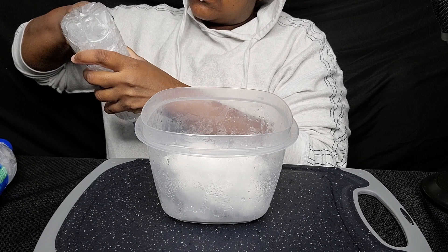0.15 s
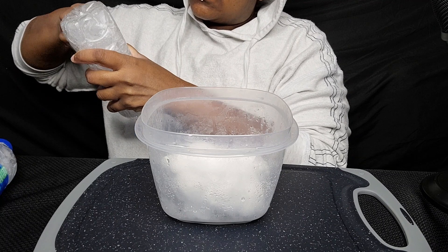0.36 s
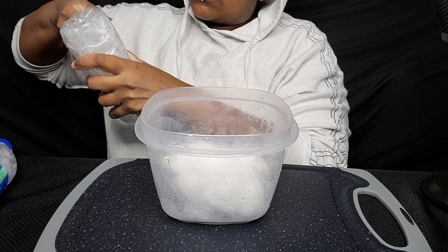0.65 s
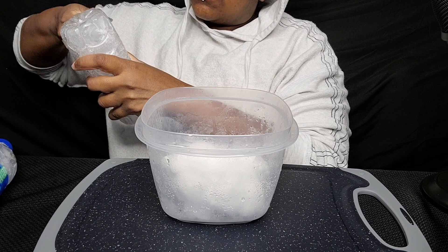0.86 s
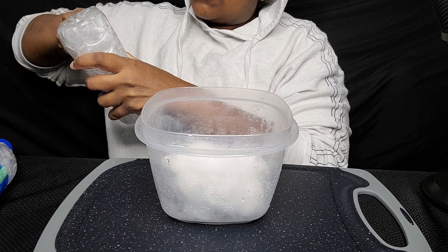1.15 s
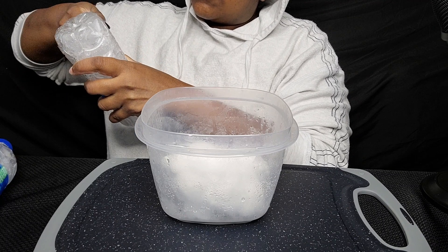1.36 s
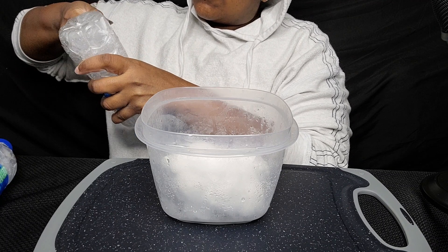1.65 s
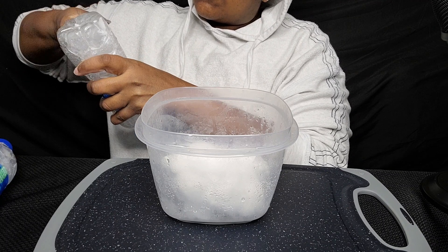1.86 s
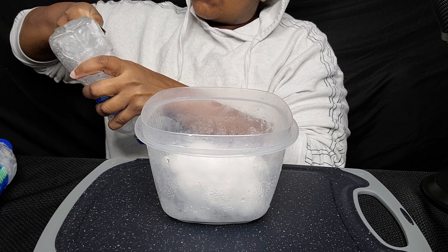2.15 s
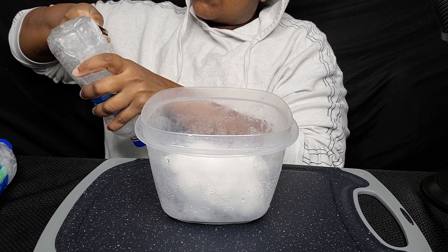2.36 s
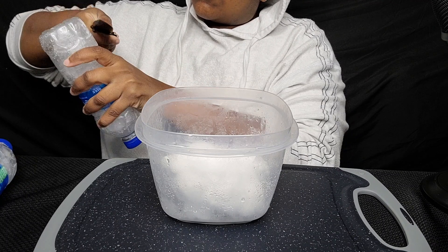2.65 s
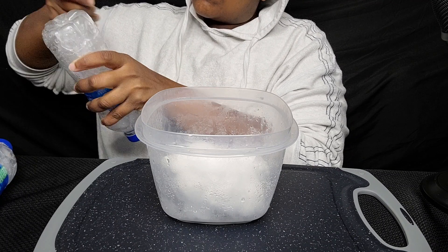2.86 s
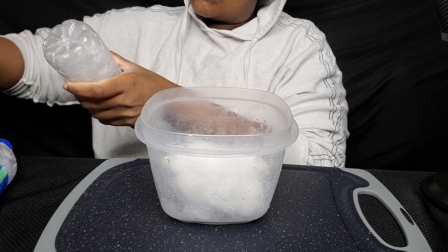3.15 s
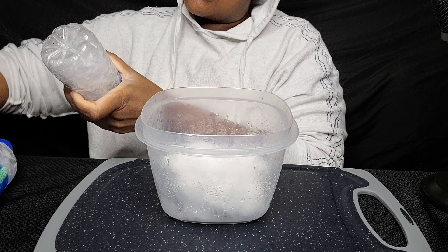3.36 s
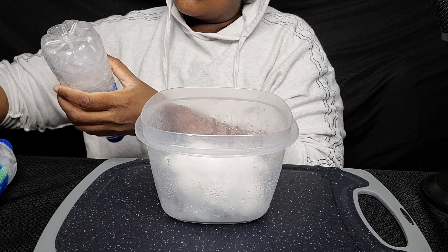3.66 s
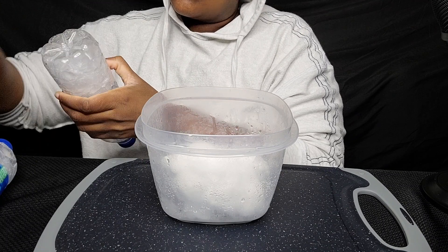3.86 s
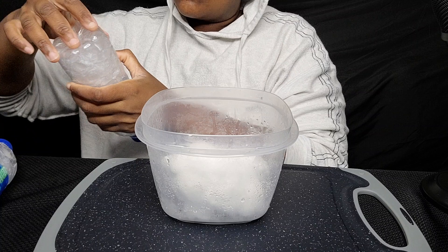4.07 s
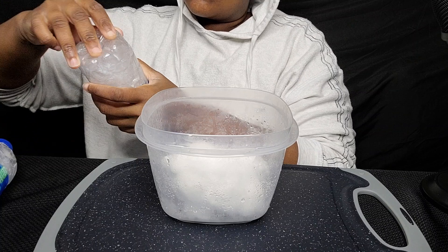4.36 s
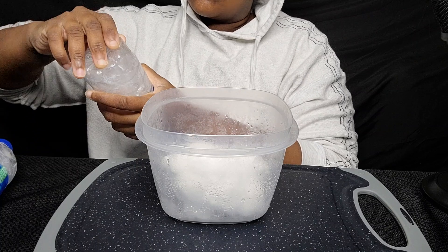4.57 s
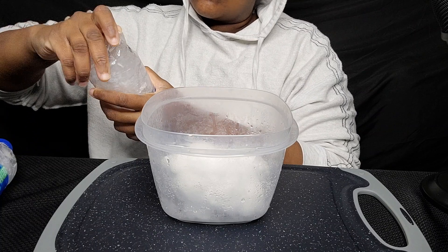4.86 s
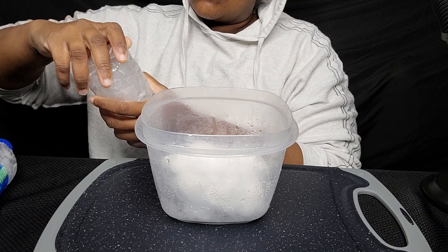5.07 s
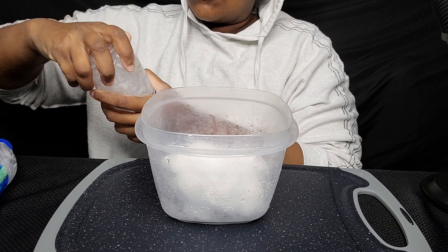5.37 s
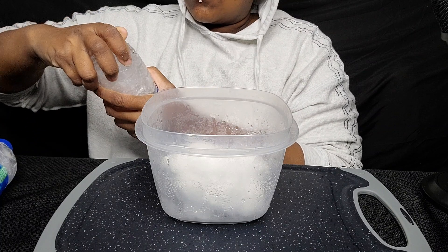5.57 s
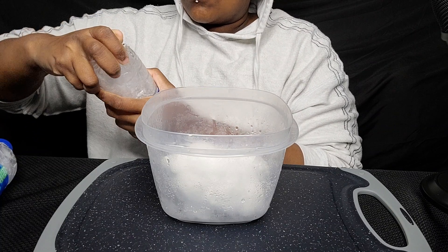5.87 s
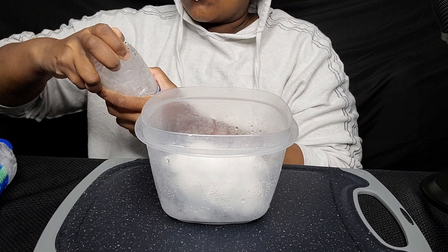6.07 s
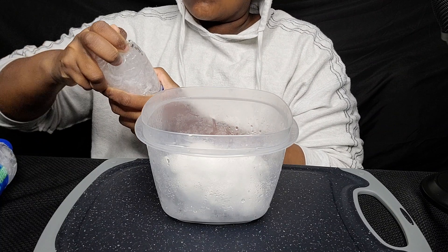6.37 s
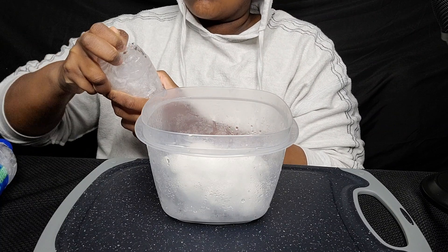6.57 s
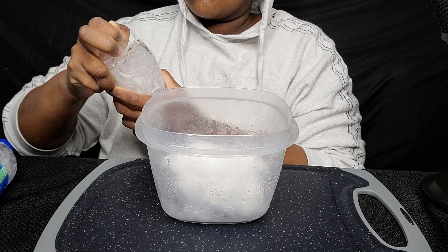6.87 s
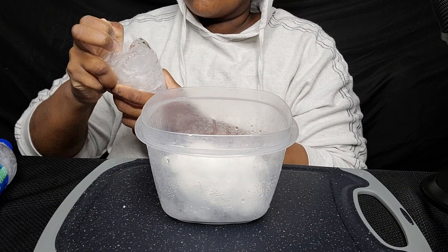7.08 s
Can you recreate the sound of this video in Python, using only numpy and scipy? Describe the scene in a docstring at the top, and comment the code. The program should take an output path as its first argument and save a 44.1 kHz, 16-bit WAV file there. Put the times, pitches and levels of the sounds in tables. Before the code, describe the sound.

Hands squeeze a plastic bottle full of crushed ice close to the microphone. The plastic snaps and pops sharply while the ice crunches and grinds inside. Midway the crackling thins and something is set down with a few dull knocks on the table. The squeezing resumes, denser and louder, with tiny ice squeaks and a few snaps that overload. A faint fan and electrical hum fill the small room.

```python
"""Sharp plastic snaps, close up in a small quiet room: hands squeeze a bottle full of crushed ice.
Folds flip with a crack that rings a panel and booms the air inside; two loud pops leave ringing,
fluttering room echoes. The ice crunches and grinds in tiny fractures and squeaks as it slips; a brief
hollow tone sounds among the first snaps. In a pause something is set down and the table knocks.
A fan and mains hum sit under it all, and the loudest snaps overload the input."""
import sys
import numpy as np
from scipy import signal
from scipy.fft import rfft, irfft, next_fast_len
from scipy.io import wavfile
from scipy.ndimage import uniform_filter1d

SR = 44100
rng = np.random.default_rng(int(sys.argv[2]) if len(sys.argv) > 2 else 0)


def wav_out(sig):
    """Save sig, one row per channel (or a flat mono array), as 16-bit PCM at SR to the path in sys.argv[1]."""
    wavfile.write(sys.argv[1], SR, np.round(np.clip(np.atleast_2d(sig).T, -1, 1) * 32767).astype(np.int16))


N = 318843

# plastic snaps, plus the ringing early room echoes of the two loud pops at 6.12 s and 6.684 s:
# t/s, crack peak/dB, ring f/Hz, ring level/dB, boom/dB, fade/ms
SNAPS_AND_ECHOES = [(0.0492, 2, 7900, -2, -22.5, 2.96), (0.0671, 0, 2700, -7, -18.5, 1.6),
                    (0.0803, -9, 3830.0, -3, -47.0, 2.3), (0.1757, -16.5, 10340.0, -12.0, -33.0, 3.1),
                    (0.1903, -7, 6630, -1, -40, 0.58), (0.1986, -8.5, 4170, -7, -32, 2.8),
                    (0.2011, -1.5, 2430, -2, -15.5, 1.9), (0.201, -11, 1500, 12, -40, 1.2),
                    (0.229, -7, 3750, -4, -50.0, 1.1), (0.249, -21, 8960.0, -3, -13.0, 1.1),
                    (0.259, -2.5, 6200, -24, -13.5, 3.03), (0.293, -12, 10550.0, -8, -29, 0.71),
                    (0.3055, -11, 10400, 10, -33.0, 0.78), (0.3896, -2, 2040, -12, -7, 3.4),
                    (0.452, -17, 8100.0, -14, -43.0, 1.3), (0.463, -19, 5470, 4, -46, 1.6),
                    (0.5655, -30, 6500, -6, -40, 1.4), (0.5776, -1, 2700, -6.5, -55, 0.61),
                    (0.6891, -30, 5810.0, -21, -36, 2), (0.6973, -15, 8600, -4, -40, 1.5),
                    (0.7022, -1, 2630, -5.5, -48, 1), (0.713, -20, 2280.0, -8.0, -46.0, 2.5),
                    (0.7343, -10.5, 3400.0, -10, -4.5, 3.2), (0.7613, -13.5, 6450, 0, -36, 1.0),
                    (0.8343, 0, 5700, 10, -54, 1), (0.8523, -6.5, 7850, 8, -49.0, 0.57),
                    (0.9108, -15, 8000, -20, -21, 1.6), (0.947, -11.5, 6500.0, -21, -24, 1.5),
                    (0.9616, -10.5, 3900, -19, -7.5, 8.1), (1.057, 1, 8560, 8.5, -56, 0.74),
                    (1.173, -24, 6600, -6, -29, 4.4), (1.2425, -12.5, 4100, -9, -44.0, 2),
                    (1.247, -24.5, 1200, -7, -35, 1.1), (1.269, -15, 7450.0, 5, -39.0, 1.9),
                    (1.286, -7.5, 8560, -17, -33, 1.76), (1.2958, -13, 3930, -11.0, -19, 2),
                    (1.337, -8, 4360, -1.5, -23.5, 1.6), (1.427, -23, 10720.0, -13.0, -25, 1),
                    (1.44, -20, 7280.0, -6.0, -24, 2.2), (1.4485, -15.5, 7150, -1, -15, 2.8),
                    (1.456, -23, 8100.0, -3, -10, 0.71), (1.463, -9.5, 3020, -10, -15, 2.2),
                    (1.472, -27, 7880.0, -11.0, -47.0, 0.94), (1.4994, 1, 5700, 2, -54, 0.55),
                    (1.568, -4, 9300, 7, -50, 1.2), (1.6874, -13.5, 9000, 11, -43, 0.4),
                    (1.7212, -1, 9700, 8, -58, 1.1), (1.731, -16.5, 5070, 9, -47.0, 2.4),
                    (1.763, -20, 8310.0, 11, -41, 0.9), (1.803, -30, 1340, 13, -35, 1.8),
                    (1.81, -23, 7880.0, -8, -41.0, 0.64), (1.8257, -6, 4060, -20, -42, 1.77),
                    (1.8847, -4.5, 4130, -4, -26, 2.2), (1.906, -24, 2800, -10, -6, 2.1),
                    (1.9279, 0.5, 8700.0, -13, -22.5, 1.44), (1.9327, -8, 2450, 1, -31, 1.5),
                    (1.951, -10.5, 8100, -16, -37, 1.6), (1.9994, 5, 8740.0, -14, -28, 0.79),
                    (2.035, -7, 6270, -21, -33.0, 3.7), (2.041, -6, 8700.0, -7, -22, 0.84),
                    (2.0454, 2, 6250, -15, -34, 1.9), (2.0654, -6.5, 2600, 0, -46.0, 3.6),
                    (2.1236, 1.5, 7800, 8, -57, 1.6), (2.141, -22.5, 1000, 16, -37, 1.9),
                    (2.1842, -4, 7880.0, -18, -44, 0.5), (2.2093, -4.5, 4600, -20, -30, 3.6),
                    (2.2163, -3.5, 7840, -20, -43, 2.4), (2.2292, -4, 4550, -22, -13.5, 3.4),
                    (2.374, -7.5, 7340, 5, -52, 0.2), (2.4436, 1.5, 7430, -11, -29, 1.9),
                    (2.467, -8, 1030, 0.5, -50.0, 0.76), (2.4763, -9, 6500.0, -12, -50.0, 1.3),
                    (2.483, 0.5, 6530, -8, -38, 0.79), (2.506, -10.5, 4780.0, -11, -8, 1.6),
                    (2.512, 5, 8050, -12, -41, 0.84), (2.518, -2.5, 3550, -8, -50.0, 3),
                    (2.5861, 2.5, 6550, -11, -52, 1.63), (2.5931, -1, 8900, -1, -43.0, 1.7),
                    (2.6117, -9, 3280, 6, -35, 2.1), (2.6346, -12.5, 2750, -0.5, -50.0, 5.1),
                    (2.787, -15, 7000, -19, -33, 1.4), (2.8027, -13, 5650, -17, -18, 1.3),
                    (2.868, -17, 3760, -12, -20, 3.9), (2.924, -9, 6300, 1, -18, 1.4),
                    (2.96, -20, 8700.0, 2, -40.0, 2.6), (3.067, -18.5, 8250, -3, -40, 0.92),
                    (3.105, -18.5, 6300, -4, -17, 1.3), (3.1658, -16.5, 1730, -10, -45, 3),
                    (3.329, -29, 2930, -14, -40, 2.2), (3.5796, -12, 8450, -14, -22, 0.76),
                    (3.98, -20.5, 5170, -10, -42, 0.73), (4.016, -27.5, 3140, -11.5, -26, 3.9),
                    (4.0324, -15.5, 2730, -4.5, -12.5, 4.2), (4.1214, -17.5, 2460, -9, -32, 3.1),
                    (4.1699, -14.5, 3380, -8, -42, 0.86), (4.208, -23.5, 1180, 2, -28, 1.3),
                    (4.296, -5, 4150, 7, -27, 1.6), (4.2968, -11, 2900, 9, -50, 1),
                    (4.4364, -16.5, 1270, -13, -3, 4), (4.4475, -11.5, 7100, -19, -50.0, 2.86),
                    (4.482, -23, 6000, -6, -45, 1), (4.51, -32, 4500, -3, -45, 0.8),
                    (4.527, -30, 3200, -4, -45, 0.88), (4.547, -5.5, 7000, 3, -48, 1.2),
                    (4.5736, -20, 8300, -22, -13, 3.7), (4.675, -10, 7200, 2, -26, 2.3),
                    (4.72, -27, 4000, -8, -45, 0.8), (4.7574, 1, 7400, -7, -58, 1.56),
                    (4.7808, -8, 5340.0, -15, -39, 2.2), (4.795, -12, 4130.0, -8, -26, 2.2),
                    (4.8003, -1, 1430, -8, -11.5, 2.2), (4.805, -1, 9500, -6, -45, 0.92),
                    (4.8084, 1.5, 8900, -1, -50.0, 0.55), (4.813, -0.5, 3270.0, -8, -50.0, 1.2),
                    (4.8223, -7.5, 2280.0, -15, -12, 4.2), (4.835, -3, 3020, -13, -50.0, 1.4),
                    (4.8484, 1, 3820, -11, -50.0, 1.3), (4.859, 1, 2780, -19, -49, 0.93),
                    (4.8694, -10, 1680.0, -17, -35, 5.3), (4.877, -7, 2630, 10, -42, 2),
                    (4.9186, -4, 2840, -14, -15, 2.4), (4.9484, -7, 7020.0, -4, -36.0, 0.55),
                    (5.031, -8, 6570, -22, -13, 2.4), (5.0378, 2.5, 2700, -5, -33, 0.72),
                    (5.066, -19, 7600, -1, -45, 1.5), (5.087, -28, 8500, -5, -45, 1),
                    (5.111, -12, 1980, 5, -16.5, 2.46), (5.151, 1.5, 4100, -3, -28, 2.3),
                    (5.163, -6, 3100, 11, -47, 3.2), (5.1734, -5, 2820, 17, -43, 1.9),
                    (5.1817, 2.5, 5850, -7, -46, 1.7), (5.254, -22, 10600, 10, -45, 2.6),
                    (5.3013, -16.5, 4320, -11.0, -39.0, 2), (5.385, -20, 9500, -5, -45, 0.8),
                    (5.3954, -13.5, 6100, 3, -13.5, 2.1), (5.4024, -4.5, 5540, -3, -22, 1.36),
                    (5.45, -1, 6400, -33, -43, 2.4), (5.483, -9.5, 9100, 6, -30, 1.6),
                    (5.5166, -7.5, 5870, -27, -23, 2.3), (5.526, -15, 9260.0, -16, -47.0, 0.94),
                    (5.5472, -14, 4340, -13, -11, 1.3), (5.5786, -0.5, 1465, 3, -23, 2.4),
                    (5.579, -5.5, 2920, 7, -50, 1.1), (5.591, -4, 4150, -17, -60, 0.93),
                    (5.6426, -6, 4200, 0, -18.5, 1.6), (5.716, -26, 1260, -2, -28, 2.2),
                    (5.753, -7, 4600, 3, -50, 1.3), (5.815, -20.5, 1660, -13, -31, 6.4),
                    (5.8368, 12.5, 8400, -5, -29.5, 0.75), (5.849, -9.5, 1570, 3, -42, 3),
                    (5.957, -2.5, 1670, 8, -23.5, 0.99), (6.003, -26, 1770, 0, -38, 1.5),
                    (6.0195, -6.5, 1830, -13, -21, 0.8), (6.085, -20, 8230.0, -13, -21, 5),
                    (6.087, -4.5, 8100, -27, -16, 2.9), (6.097, 2, 10470.0, -7, -50.0, 0.65),
                    (6.1201, 2, 2020, 2, -56, 2.04), (6.1336, -7, 1850, 3, -52, 2.8),
                    (6.1394, -2, 3380, 14, -44, 2.2), (6.141, -5.5, 1830, 19, -50, 2.2),
                    (6.1476, -1, 7450.0, -12, -37, 1.5), (6.1695, 1.5, 4530, -18, -23.5, 2.47),
                    (6.214, -19, 2410.0, -12.0, -48.0, 2), (6.226, -4, 6750, -4, -55, 0.4),
                    (6.2435, -2.5, 8340, -6, -45, 0.57), (6.2736, -3, 6600, -15, -47, 0.37),
                    (6.2827, 5, 7100, -17, -31, 0.57), (6.3015, -3.5, 6540, -12, -50.0, 2.2),
                    (6.3128, -4, 6800, -10, -28, 1.5), (6.3267, -1, 6500.0, -17, -50.0, 0.52),
                    (6.3536, -3.5, 8400, 5, -46, 0.59), (6.3598, 2, 4270, -10, -43, 0.61),
                    (6.3696, -9.5, 1280, 1, -6.5, 3.5), (6.3741, -1.5, 4100, -11, -18, 2.65),
                    (6.445, -17, 1690, -6, -32, 2), (6.4831, 14, 5000, -15, -33, 0.24),
                    (6.5411, -4.5, 4530, -12, -12, 1.9), (6.5911, -11, 6600, 0, -22, 1.4),
                    (6.6158, -2.5, 8300, -18, -51, 0.63), (6.6255, -32, 7240.0, -12.0, -38.0, 2),
                    (6.6332, -2, 8300, -9, -39, 0.47), (6.647, -2.5, 8600, 1, -49.0, 0.57),
                    (6.6548, -12, 3960.0, 6, -32, 0.87), (6.6842, -2, 2070, -5, -58, 3),
                    (6.6954, -2.5, 3970, -4, -50.0, 2.9), (6.7056, -2, 2900, 10, -47, 2.7),
                    (6.7237, 2.5, 4540, -14, -28.5, 1.2), (6.734, -4, 7450.0, -13, -53, 0.82),
                    (6.7709, 0, 2670, -19, -25, 2.8), (6.7873, -9, 7580.0, -3, -50.0, 1.3),
                    (6.807, -3, 6400, 10, -52, 1), (6.8224, -3.5, 7900, -13, -32, 3),
                    (6.835, -9, 4400, 8, -50.0, 0.99), (6.879, -9.5, 4610.0, 1, -41, 1.4),
                    (6.8886, 3, 6740, -8, -50, 0.57), (6.9001, -1.5, 1820, 3, -14, 1.3),
                    (6.9001, -9, 1160, 6, -50, 1.9), (6.9369, -4.5, 1980, 7, -50.0, 1.8),
                    (6.9628, 4.5, 1330, -7, -32, 0.78), (6.9716, -7, 5540, -5, -17, 2.94),
                    (7.0368, 0, 2880, -10, -22.5, 1.9), (7.0477, 4, 1290.0, -9.5, -18, 0.87),
                    (7.0575, 12, 6200, -2, -41, 1.2), (7.058, -5, 1820, 12, -50, 1.3),
                    (7.071, -6, 4750, -19, -50.0, 2), (7.078, -4.5, 6420.0, -12, -50.0, 2.6),
                    (7.0982, -12, 10720.0, -10.0, -25, 1.9), (7.107, -5, 9910.0, 4, -48, 2.0),
                    (7.1118, -4, 10100, 13, -50.0, 2.8), (7.1166, -1.5, 7150, 17, -47.0, 0.45),
                    (7.1317, -13, 6240.0, -6, -15, 1.8), (7.1993, 6.5, 7350, -13, -34.5, 1.7)]
# tone colour of plastic and ice: f/Hz, level/dB
SHELL_SPECTRUM = [(290, 4), (500, -1.5), (720, -7.5), (900, -4), (1100, -1.5), (1730, -0.5), (2290, -0.5),
                  (2890, 0.5), (7940, 1), (14900, -11), (16500, -16)]
# hollow low body that the grip leaves the shell: t/s, level/dB
GRIP_BODY = [(0, -0.5), (1.2, -4.5), (1.8, 2.5), (2.6, 3.5), (3.3, 3.5), (4.5, 0.5), (5.3, -2), (6.1, -2.5),
             (6.22, -29), (6.33, -7.5), (6.38, 3), (6.6, -7), (6.85, -13.5), (6.93, -2), (7.23, -3)]
# gritty bursts: ice crumbling, and at 6.13 s and 6.697 s the echo flutter after the two loud pops:
# t/s, length/s, crest level/dB, crest place/0-1, ring f/Hz, ring level/dB, boom/dB
GRITTY_BURSTS = [(0.077, 0.031, -26.5, 0.3, 2800, -10, -24), (0.195, 0.031, -28, 0.2, 990, -2, -30),
                 (0.394, 0.039, -22, 0, 1920, -12, -19), (0.592, 0.03, -33.5, 0.15, 3160, -4, -25),
                 (0.709, 0.051, -29.5, 0.34, 2050, -19, -28), (0.839, 0.11, -34.5, 0, 6890.0, -13, -19),
                 (1.064, 0.038, -20, 0, 6470, 1, -27), (1.44, 0.028, -43, 0.6, 6890.0, -4.0, -12),
                 (1.475, 0.027, -40, 0.9, 1140, 15, -22), (1.509, 0.027, -36, 0.2, 5500, -1, -26),
                 (1.582, 0.033, -35.5, 0.1, 4020, -10, -22), (1.888, 0.023, -35.5, 0.9, 3790.0, -6, -7),
                 (1.954, 0.082, -25.5, 0.68, 7500, -4.0, -23), (2.05, 0.045, -18, 0, 8270.0, -27, -33),
                 (2.13, 0.022, -26.5, 0.1, 8610.0, -10, -29), (2.21, 0.025, -24.5, 0.1, 6200.0, -26, -33),
                 (2.45, 0.038, -22, 0.2, 3220, -9, -10), (2.513, 0.057, -21.5, 0, 1380, -28, -13.5),
                 (2.594, 0.073, -29, 0.4, 2750, -17, -8.5), (2.737, 0.17, -45, 1, 3450.0, -15, -24),
                 (3.141, 0.049, -35.5, 0.03, 5140, -4, -8), (3.52, 0.091, -40.5, 0.55, 2540, -6, -25),
                 (4.062, 0.044, -31, 0.95, 2460, -34, -11), (4.31, 0.049, -36.5, 0.1, 2780, -7, -4.5),
                 (4.416, 0.041, -34, 0.95, 2080, -37, -10), (4.763, 0.022, -34, 0.44, 4800, -2, -25.0),
                 (4.813, 0.019, -15, 0.7, 3180, -8, -22), (4.865, 0.025, -18, 0.5, 3030, -11, -26.0),
                 (5.03, 0.018, -41, 0.1, 2740, -7, -18.0), (5.118, 0.022, -50, 0.5, 1880, 15, -25),
                 (5.157, 0.13, -31, 0, 3160, 1, -13), (5.197, 0.019, -41, 0.7, 1570, 9, -23),
                 (5.457, 0.026, -39, 0.3, 9200, -6, -25), (5.511, 0.016, -31, 0.4, 2070.0, -13, -17),
                 (5.603, 0.024, -33.5, 0.05, 1600, 8, -21), (5.842, 0.055, -26, 0.1, 1580, -4, -10),
                 (5.87, 0.05, -34.5, 0.1, 8600, 2, -31), (5.969, 0.023, -35, 0.2, 1710, 10, -16),
                 (6.13, 0.013, -21, 0.6, 2010, -2, -29), (6.148, 0.016, -22.5, 0.3, 2120, -6, -34),
                 (6.173, 0.028, -23.5, 0.05, 2380, 4, -16), (6.281, 0.019, -21.5, 0.3, 6340, -17, -16),
                 (6.362, 0.012, -31, 0.4, 1070, -19, -1), (6.498, 0.034, -33, 0.3, 6350, -1, -8),
                 (6.697, 0.013, -18, 0.4, 3440, 4, -30), (6.732, 0.037, -22.5, 0.33, 2430, -20, -15),
                 (6.892, 0.022, -31, 0.05, 1750, -11, -22), (7.058, 0.059, -22, 0.3, 6500, 2, -14),
                 (7.212, 0.017, -15, 0.64, 1660, -4, -8.5)]
# the bed of grinding ice: t/s, level/dB, treble/dB
GRIND_CURVE = [(0, -37.5, -6.5), (.5, -55.5, 2), (1, -42, -3), (1.3, -55.5, 5.5), (1.8, -47, 7.5),
               (2.05, -43, 5), (2.3, -50.5, 5.5), (2.75, -38, -3), (3.05, -42.5, -2), (3.25, -55, -2.5),
               (3.6, -39, -3.5), (4.1, -42.5, -6), (4.7, -52, -1.5), (4.95, -44, -5), (5.35, -44, -21),
               (5.75, -49, -3), (6.25, -33.5, -7.5), (6.6, -38, -5), (7.23, -41, 4.5)]
# stick-slip glides, one list a squeak: t/s, slip rate/Hz, level/dB
SQUEAK_GLIDES = [
    [(4.973, 371, -20), (4.98, 554, -18.5), (4.99, 957, -26), (5.0, 1440, -19.5), (5.006, 2000, -24),
     (5.012, 2800, -33)],
    [(5.357, 1110, -39), (5.363, 1036, -32), (5.37, 1430, -29.5), (5.377, 2180, -42)],
    [(5.404, 1230, -16), (5.409, 1506, -26), (5.414, 2054, -28), (5.421, 2000, -25), (5.427, 1330, -22.5),
     (5.44, 847, -24), (5.45, 692, -28), (5.46, 532, -27), (5.468, 272, -27), (5.479, 131, -31)],
]
# character of each squeak: treble/dB, unevenness/0-1
SQUEAK_TONES = [(1.5, 0.3), (0, 0), (4.5, 0.4)]
# resonances of the ice: f/Hz, width/Hz, level/dB
ICE_MODES = [(2640, 1200, -1), (4130, 610, 1.5), (6200, 1900, 1.5), (8700, 760, 1), (10100, 1300, -1),
             (13400, 2700, -3)]
# knocks on the table: t/s, level/dB, deep modes/dB, hardness/dB
TABLE_KNOCKS = [(3.432, -11.5, 7, -0.5), (3.454, -4, 4, 5.5), (3.683, -6, 7, 6.5), (3.702, -16, -10, -6),
                (3.754, -0.5, -11.5, 6), (3.83, -13.5, -19, -29)]
# resonances of the table top: f/Hz, level/dB, t60/s, rise/ms
TABLE_MODES = [(27, -36, 1.5, 20), (57.5, -38, 1.3, 20), (75, -6, 0.65, 44), (118.7, -26, 0.37, 19),
               (139.7, 9, 0.17, 26), (145, -11, 0.19, 20), (191, -8.5, 0.17, 3.3), (286, -8, 0.055, 3.7),
               (337, -16.5, 0.092, 3.3), (464, -4.5, 0.034, 6.6), (665, -8, 0.025, 1.4),
               (803, -20, 0.035, 1.5), (1150, -2, 0.0065, 1.3), (1660, -11, 0.013, 2.3)]
# decay of the room: f/Hz, t60/s
ROOM_DECAY = [(250, 0.34), (700, 0.4), (1740, 0.31), (4590, 0.27), (8000, 0.31), (13000, 0.27)]
# fan rumble and hiss: f/Hz, level/dB
FAN_SPECTRUM = [(15, -42), (25, -5), (108, 11), (142, -3), (167, 4), (245, 4), (304, 2), (538, -5.5),
                (669, -16), (2270, -94), (2670, -86), (7510, -71.5), (15200, -96), (16500, -58)]
# hum lines: f/Hz, level/dB
HUM_LINES = [(59.8, -58), (91, -48.5), (120, -46.5), (240, -52.5)]

BOOM_HZ, BOOM_T60_S = 373, 0.039  # air in the bottle; each snap varies around these
FLEX_HZ, FLEX_T60_S = 505, 0.027  # the whole shell flexing, freest in a loose grip; its pitch varies too
OVERTONE_RATIO = 1.568  # a panel's second ring


def snap(hz, ring_db, boom_db, treble_db, fade_ms, burst, body_db=0., squeeze=1.0):
    """A snap or its echo: a sharp break and dying fractures, a panel's ring, the bottle's boom."""
    t = np.arange(len(burst)) / SR
    fade = max(fade_ms, .05) / 1000
    rise = max(fade - .0025, 0) + 1 / SR  # only long snaps get a soft attack
    shock = burst * abs(burst) ** 0.86 * np.exp(-t / fade) * (1 - np.exp(-(t + 1 / SR) / rise))
    shock[0] -= 5.7 * np.exp(-fade_ms / 4.0)  # the break itself
    shell = np.convolve(shock, shell_response(0.96 * (treble_db - 2.0), body_db))[:len(t)]
    kick = 0.5 * shock - 5 * (t == 0)
    width = 0.27 * hz
    partials = (hz, 1), (min(OVERTONE_RATIO * hz, 15000), gain_of(-10.5))
    panel = sum(gain * ring(ring(kick, f, width), f, width) for f, gain in partials)
    crack = unit_rms(shell) + gain_of(ring_db) * unit_rms(panel)
    air_t60 = BOOM_T60_S * gain_of(1.5 * burst[-2])
    air = np.sin(2 * np.pi * BOOM_HZ * squeeze * t) * gain_of(-60 * t / air_t60)
    flex = np.sin(2 * np.pi * FLEX_HZ / squeeze * t) * gain_of(body_db - 10.0 - 60 * t / FLEX_T60_S)
    boom = (air + flex) * (1 - np.exp(-t / 0.00098))
    return crack / abs(crack).max() + gain_of(boom_db) * boom


def snaps_and_echoes(send_db=-8.5):
    """Snaps and early echoes, and their room send, where many paths blend each into one smooth blow."""
    hits, send = np.zeros(N), np.zeros(N)
    bursts = rng.standard_normal((len(SNAPS_AND_ECHOES), 1600))
    for (start, db, hz, ring_db, boom_db, fade_ms), burst in zip(SNAPS_AND_ECHOES, bursts):
        treble_db, body_db = panel_brightness(hz), grip_body(start)
        squeeze = 1 + 0.04 * burst[-1]  # the air space changes with each squeeze
        hit = snap(hz, ring_db, boom_db, treble_db, fade_ms, burst, body_db, squeeze)
        add(hits, start, gain_of(db) * hit)
        far_ring_db = min(ring_db, -10) - hz / 2500  # little of the ring goes to the send
        blow = snap(hz, far_ring_db, boom_db - 11.0, treble_db - 3.0, 1, 0 * burst, body_db, squeeze)
        add(send, start, gain_of(db + send_db) * np.sqrt(fade_ms) * blow)
    return hits, send


def shell_response(treble_db=0., body_db=0., size=512):
    """The shell's impulse response, with treble and body tilts; a small shell sends out no bass."""
    hz = abs(np.fft.fftfreq(size, 1 / SR)) + 1
    tilt_db = treble_db * np.clip(np.log2(hz / 5000), -1, 1.5)
    tilt_db += body_db * np.clip(np.log2(1900 / hz), 0, 1)
    low_cut_db = 21.7 * np.minimum(np.log2(hz / 300), 0)
    log_gain = np.log(gain_of(curve_at(SHELL_SPECTRUM, hz) + tilt_db + low_cut_db))
    minimum_phase = np.exp(np.conj(signal.hilbert(log_gain)))
    return np.fft.ifft(minimum_phase).real[:size // 2]


def panel_brightness(hz):
    """Small, high panels snap brighter: their treble setting in dB."""
    return 2 + 2.5 * np.log2(hz / 4880)


def grip_body(t):
    """A tight grip damps the shell's hollow body: its setting in dB at time t."""
    return np.interp(t, *np.transpose(GRIP_BODY))


def gritty_burst(start, length, db, crest, hz, ring_db, boom_db, noise, attack_s=0.0015, release_s=0.017):
    """Crumbling ice or echo flutter: dense grit swells and sags with the bottle's colour, ring and boom."""
    hiss, roughness, wander = noise[:, :round((length + 8 * release_s) * SR)]
    t = np.arange(len(hiss)) / SR
    grit = hiss * gain_of(5 * smoothed(roughness, 24))
    shell = signal.oaconvolve(grit, shell_response(panel_brightness(hz) - 2.0, grip_body(start)))[:len(t)]
    width = 400 + 0.3 * hz
    bend = 1 + 0.05 * smoothed(wander, 500)  # the ring drifts in pitch
    partials = (hz, 1), (OVERTONE_RATIO * hz, gain_of(-26))
    ringing = sum(gain * unit_rms(gliding_ring(grit, f * bend, width)) for f, gain in partials)
    crackle = unit_rms(unit_rms(shell) + gain_of(ring_db) * ringing)
    boom = gain_of(boom_db) * unit_rms(ring(grit, BOOM_HZ, width=58))
    swell_db = np.interp(t / length, [0, np.clip(crest, .02, .98), 1], [-4, 0, -10.5])
    edges = np.minimum(t / attack_s, 1) * np.exp(-np.maximum(t - length, 0) / release_s)
    return gain_of(db + swell_db) * edges * (crackle + boom)


def grind(grains_per_s=700, pitches=12):
    """Ice grinds: countless tiny fractures of mixed size and pitch, blended with a soft smear of shell-coloured
    hiss."""
    times, level_db, treble_db = np.transpose(GRIND_CURVE)
    t = np.arange(N) / SR
    sizes = gain_of(6 * np.minimum(rng.exponential(1, N), 3.5))
    fractures = sizes * (rng.random(N) < grains_per_s / SR)
    pitch_index, grains = rng.integers(0, pitches, N), np.zeros(N)
    for k, burst in enumerate(rng.standard_normal((pitches, 1500))):
        hz = 1300 * 9 ** (k / pitches)
        grain = snap(hz, ring_db=-13.5, boom_db=-26.0, treble_db=4.2, fade_ms=1.0, burst=burst)
        grains += signal.oaconvolve(fractures * (pitch_index == k), grain)[:N]
    smear = signal.oaconvolve(rng.standard_normal(N), shell_response())[:N]
    bed = unit_rms(unit_rms(grains) + 0.28 * unit_rms(smear))
    body, below_treble = (signal.sosfilt(signal.butter(2, edge_hz, fs=SR, output="sos"), bed)
                          for edge_hz in (1100, 4000))
    mids = below_treble - body
    treble = gain_of(np.interp(t, times, treble_db)) * (bed - below_treble)
    return gain_of(np.interp(t, times, level_db)) * (gain_of(grip_body(t)) * body + mids + treble)


def squeak(glide, treble_db, uneven):
    """Ice sticks and slips on ice in a quick train; each slip rings the ice."""
    times, rate_hz, level_db = np.transpose(glide)
    t = np.arange(times[0], times[-1] + 0.005, 1 / SR)
    jitter = 1 + uneven * uniform_filter1d(rng.standard_normal(len(t)), size=60)
    cycles = np.cumsum(np.interp(t, times, rate_hz) * jitter) / SR
    slips = np.diff(np.floor(cycles + 1), prepend=0) * (t < times[-1])
    slips *= gain_of(2.0 * rng.standard_normal(len(t)))
    ice = np.zeros(len(t))
    for k, (hz, width, db) in enumerate(ICE_MODES):
        mode = unit_rms(ring(ring(slips, hz, width), hz, 2 * width))
        ice += (-1) ** k * gain_of(db + treble_db * (hz > 8000)) * mode
    return gain_of(np.interp(t, times, level_db)) * unit_rms(ice)


def knock(deep_db, hard_db, rattle_hz=640, rattle_width_hz=430, rattle_t60_s=0.088):
    """The table's modes swell and die; a harder blow wakes the upper ones and rattles loose things."""
    t = np.arange(3 * SR // 4) / SR
    shake = ring(rng.standard_normal(len(t)), rattle_hz, rattle_width_hz)
    shake = unit_rms(ring(shake, rattle_hz, rattle_width_hz))
    rattle = gain_of(-22.5 + hard_db - 60 * t / rattle_t60_s) * shake
    thud = np.zeros(len(t))
    for hz, db, t60, rise_ms in TABLE_MODES:
        decay = gain_of(db + deep_db * (hz < 100) + hard_db * (hz > 250) - 60 * t / t60)
        thud -= decay * (1 - np.exp(-t * 1000 / rise_ms)) * np.sin(2 * np.pi * hz * t)
    return rattle + thud


def hollow_tone(start_s=0.211, hz=895.5, db=-33.5, t60_s=0.28, rise_ms=3):
    """One soft, rough hollow ring that swells and dies."""
    t = np.maximum(np.arange(N) / SR - start_s, 0)
    rough = 1 + 0.62 * smoothed(rng.standard_normal(N), 150)
    envelope = gain_of(db - 60 * t / t60_s) * (1 - np.exp(-t * 1000 / rise_ms))
    return envelope * rough * np.sin(2 * np.pi * hz * t)


def room(send, cluster_start_ms=12.0, cluster_end_ms=29.0, onset_db=1.0, cluster_db=4.0):
    """Sound crosses to the walls and back: a cluster of stronger early echoes, then a dense tail."""
    taps = np.zeros(SR // 2)
    slots = np.arange(0, len(taps) - 12, 12)
    taps[slots + rng.integers(0, 12, len(slots))] = rng.choice([-1., 1.], len(slots))
    hz, t, spectrum = signal.stft(taps, SR, nperseg=256)
    decay = gain_of(-60 * t / curve_at(ROOM_DECAY, hz)[:, None])
    tail = signal.istft(spectrum * decay, SR, nperseg=256)[1]
    ms = np.arange(len(tail)) * 1000 / SR
    early_db = np.select([ms < cluster_start_ms, ms < cluster_end_ms], [onset_db, cluster_db])
    uneven_db = 3.3 * smoothed(rng.standard_normal(len(tail)), 60)
    tail *= gain_of(early_db + uneven_db)
    return signal.oaconvolve(send, tail / np.linalg.norm(tail))[:N]


def fan_and_hum(sink_db_per_s=0.79):
    """Fan noise and hiss with slightly wavering hum lines, all sinking slowly in level."""
    t, size = np.arange(N) / SR, next_fast_len(N)
    colour = gain_of(curve_at(FAN_SPECTRUM, np.fft.rfftfreq(size, 1 / SR)))
    fan = irfft(rfft(rng.standard_normal(size)) * colour, size)[:N]
    bed = gain_of(-50) * unit_rms(fan)
    for hz, db in HUM_LINES:
        waver = smoothed(uniform_filter1d(rng.standard_normal(N), size=3000), 3000)
        phase = 2 * np.pi * (hz * t + rng.random()) + 0.37 * waver
        bed += np.sqrt(2) * gain_of(db + 1.5 * waver) * np.sin(phase)
    return bed * gain_of(2 - sink_db_per_s * t)


def ring(x, hz, width):
    """A steady resonance of gain about 1 at its centre."""
    radius = np.exp(-np.pi * width / SR)
    return 2 * signal.lfilter([1 - radius], [1, -radius * np.exp(2j * np.pi * hz / SR)], x).real


def gliding_ring(x, hz, width):
    """A steep resonance that follows a pitch curve."""
    carrier = np.exp(2j * np.pi * np.cumsum(hz) / SR)
    radius = np.exp(-np.pi * width / SR)
    feedback = np.convolve([1, -radius], [1, -radius * radius])
    return (carrier * signal.lfilter([1], feedback, x / carrier)).real


def gain_of(db):
    return 10 ** (np.asarray(db) / 20)


def unit_rms(x):
    return x / np.sqrt(np.mean(x ** 2) + 1e-20)


def smoothed(noise, samples):
    return unit_rms(uniform_filter1d(noise, size=samples))


def curve_at(points, hz):
    f, value = np.transpose(points)
    return np.interp(np.log(hz + 1), np.log(f + 1), value)


def add(mix, start, sound):
    part = mix[round(start * SR):][:len(sound)]
    part += sound[:len(part)]


def scene():
    """Bottle, ice and table up close, the room behind them, fan and hum underneath; mono."""
    snaps, snap_send = snaps_and_echoes()
    grit, squeaks, knocks = np.zeros((3, N))
    for row, noise in zip(GRITTY_BURSTS, rng.standard_normal((len(GRITTY_BURSTS), 3, SR // 4))):
        add(grit, row[0], gritty_burst(*row, noise))
    for glide, tone in zip(SQUEAK_GLIDES, SQUEAK_TONES):
        add(squeaks, glide[0][0], squeak(glide, *tone))
    for start, db, deep_db, hard_db in TABLE_KNOCKS:
        add(knocks, start, gain_of(db) * knock(deep_db, hard_db))
    low_cut = signal.butter(2, 105, "high", fs=SR, output="sos")  # the deepest modes are a close sound
    send = snap_send + gain_of(-5.5) * grit + gain_of(-13.5) * squeaks
    send += gain_of(-10.0) * signal.sosfilt(low_cut, knocks)
    angle = np.pi * np.arange(N) / SR / .07  # the hands keep moving, so no two snaps meet the walls alike
    reverb = room(send * np.cos(angle)) + room(send * np.sin(angle))
    return (snaps + grit + squeaks + knocks + reverb + hollow_tone() + grind() + fan_and_hum())[None]


def record(dry, ceiling=.93, cutoff_hz=16400):
    """The loudest snaps clip the input; a steep low-pass then trims the top end."""
    clipped = np.clip(dry, -ceiling, ceiling)
    low_pass = signal.firwin(255, cutoff_hz, window=("kaiser", 9), fs=SR)
    return signal.oaconvolve(clipped, low_pass[None], "same")


dry = scene()
out = record(dry)
wav_out(out)
```